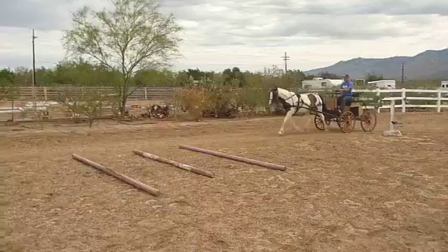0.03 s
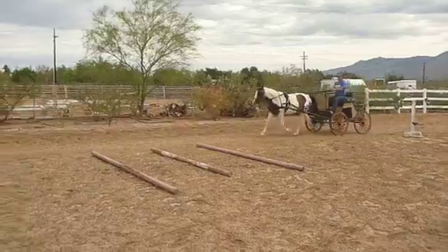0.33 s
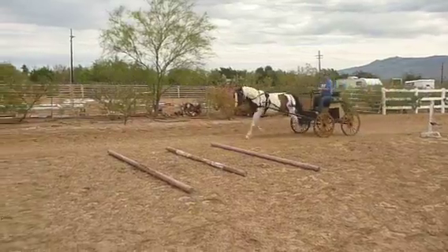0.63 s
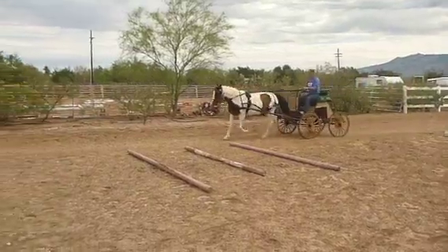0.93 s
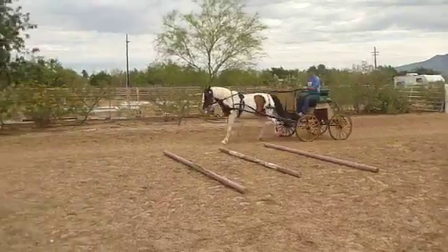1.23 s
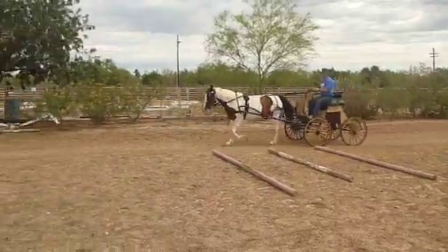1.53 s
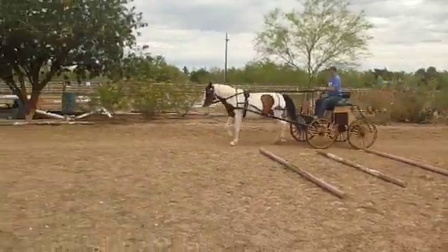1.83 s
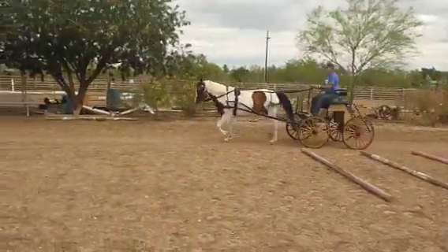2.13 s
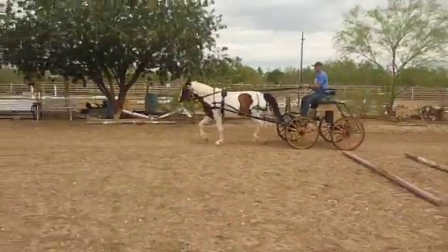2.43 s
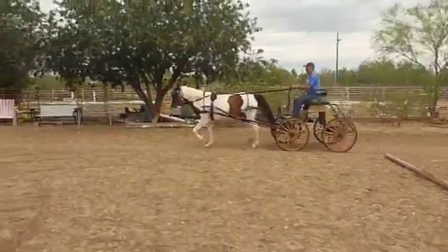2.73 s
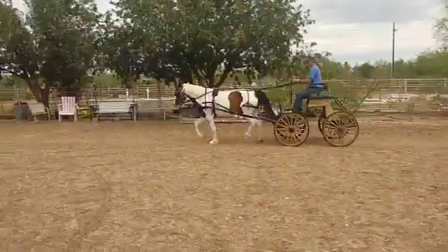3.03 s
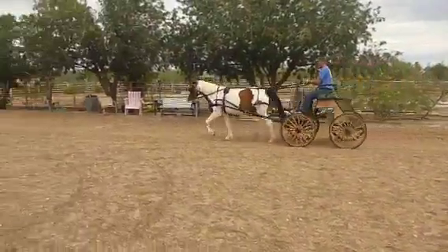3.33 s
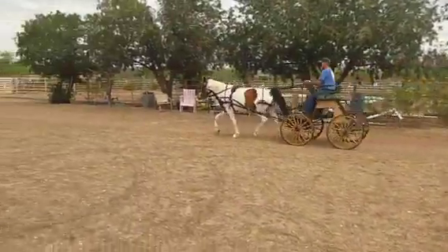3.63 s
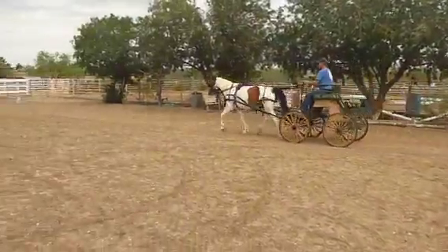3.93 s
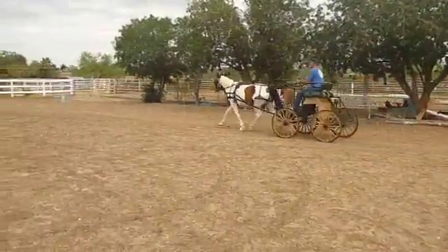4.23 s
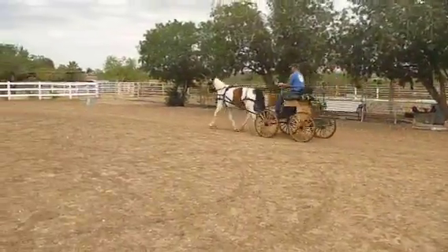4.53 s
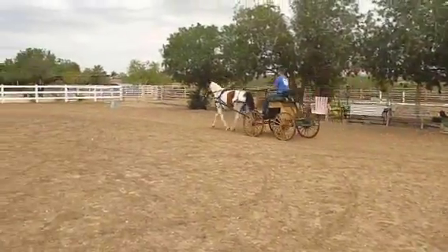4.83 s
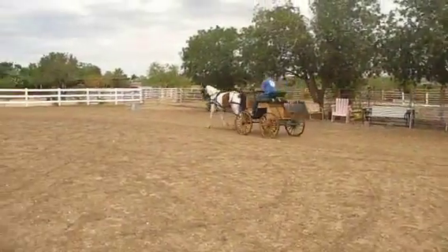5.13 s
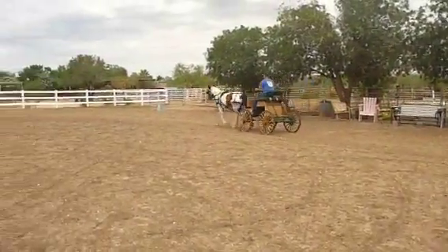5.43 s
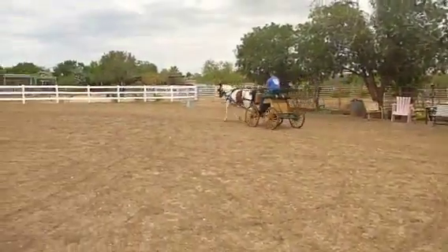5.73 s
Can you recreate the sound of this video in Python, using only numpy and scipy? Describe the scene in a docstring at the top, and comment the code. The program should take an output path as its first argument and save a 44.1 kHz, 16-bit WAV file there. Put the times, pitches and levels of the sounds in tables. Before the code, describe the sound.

A horse-drawn carriage rolls over sandy dirt outdoors, heard from start to finish above a faint hiss. The wheels make a continuous gritty crunch, while irregular jolts, many each second, rattle loose iron fittings, clack wooden shafts and give the hollow body low thumps. Bright little clinks stand out here and there. A wheel rings with a soft hollow note at about 1.2 and 2.1 seconds. The clatter is a little fuller from about 2.7 to 4.9 seconds, then eases slightly. Harness straps scuff and buckles click faintly, with brief thin metal squeaks around 0.8, 1.5, 2.4, 4.4 and 5.4 seconds. Light wind puffs on the microphone with a low rumble near 0.8, 1.7, 2.1 and 3.2 seconds. At about 5.8 and 5.9 seconds, two sharp, dry knocks sound close to the microphone, louder than everything else.

```python
"""Horse carriage on soft dirt

A horse walks a four-wheeled carriage past. The wheels crunch along, and each jolt rattles loose iron
fittings, wooden shafts and the hollow body. Harness straps scuff and their metal parts squeak thinly.
Light wind puffs at the microphone, and two sharp knocks sound close by at the end."""
import sys
import numpy as np
from scipy import signal
from scipy.fft import rfft, irfft, next_fast_len
from scipy.io import wavfile
from scipy.ndimage import uniform_filter1d, map_coordinates

SR = 44100
rng = np.random.default_rng(int(sys.argv[2]) if len(sys.argv) > 2 else 0)


def inscribe(sig):
    """Save sig as 16-bit PCM at rate SR to the path in sys.argv[1].

    A 1-D sig is mono; a 2-D sig holds one channel per row.
    Samples are clipped to [-1, 1] before scaling.
    """
    pcm = np.round(np.clip(np.atleast_2d(sig).T, -1, 1) * 32767)
    wavfile.write(sys.argv[1], SR, pcm.astype(np.int16))


N = 264159
T = np.arange(N) / SR


def amp(db):
    """Turn decibels (dB) into a number to multiply a sound by."""
    return 10 ** (np.asarray(db) / 20)


def unit(x):
    """Scale a sound to an average power of 1."""
    return x / np.sqrt(np.mean(x ** 2) + 1e-20)


def burst(x, seconds=0.022):
    """Give a short sound as much energy as a power of 1 held for this long."""
    return x / np.linalg.norm(x) * np.sqrt(seconds * SR)


def curve(rows):
    """Join (time, value) points with straight lines, one value per sample."""
    return np.interp(T, *np.transpose(rows))


def wobble(rate):
    """A smooth random curve through rate points a second."""
    return map_coordinates(rng.standard_normal(int(N * rate / SR) + 4), [T * rate])


def tone(t, hz, db, t60):
    """A ringing note. Its ring time, t60, is the seconds it takes to fade by 60 dB."""
    return amp(db - 60 * t / t60) * np.sin(2 * np.pi * hz * t)


def excite(force, ring):
    """Let every push in the force start its own copy of the ring."""
    return signal.fftconvolve(force, ring)[:len(force)]


def coloured(x, points, size=4096):
    """Filter a sound so that its lows and highs follow the (Hz, dB) points."""
    hz, db = np.transpose(points)
    log_hz = np.log(np.fft.rfftfreq(size, 1 / SR) + 1)
    cepstrum = irfft(np.log(amp(np.interp(log_hz, np.log(hz), db))))
    # make the filter ring only after a hit, never before
    cepstrum[1:size // 2] *= 2
    cepstrum[size // 2 + 1:] = 0
    response = irfft(np.exp(rfft(cepstrum)))
    return excite(x, response / np.linalg.norm(response))


def around(x, hz, edge_db):
    """Keep a broad band around hz, falling to edge_db an octave to either side."""
    return coloured(x, [(hz * 2.0 ** octave, abs(octave) * edge_db) for octave in range(-2, 3)])


def grains(count, rate, spread_db):
    """Tiny random hits of uneven size, about rate of them a second."""
    hits = rng.random(count) < rate / SR
    sizes = amp(spread_db * rng.standard_normal(count))
    return unit(hits * sizes * rng.choice([-1, 1], count))


def chatter(rate, attack, t60, tail_db, tail_t60):
    """The force of a loose part hitting its seat: a quick run of hits, then weaker bounces."""
    t = T[:SR // 5]
    rise = 1 - np.exp(-t / attack)
    fall = amp(-60 * t / t60) + amp(tail_db - 60 * t / tail_t60)
    return grains(len(t), rate, spread_db=2.0) * rise * fall


def add(track, start, sound):
    """Mix a sound into the track, start seconds in."""
    room = track[max(round(start * SR), 0):][:len(sound)]
    room += sound[:len(room)]


# The tone of the hiss. Each row: frequency in Hz, relative level in dB.
HISS_COLOUR = [(30, -16.5), (150, 21.5), (1000, 9.5), (3000, 12.5), (6200, 2), (6650, 14.5), (7100, 13.5),
               (7400, -10.5)]

def hiss():
    """A faint, steady noise behind everything."""
    return amp(-51.5) * coloured(rng.standard_normal(N), HISS_COLOUR)


# The light breeze. Each row: time in seconds, level in dB.
BREEZE_LEVELS = [(0.2, -51), (2.5, -46), (3.7, -57.5), (5.8, -51)]
# Gusts. Each row: time of the peak in seconds, level in dB, rise and fall time in seconds,
# pitch of the swirl of air in Hz.
WIND_GUSTS = [(0.783, -38, 0.037, 330), (0.804, -34.5, 0.011, 150), (0.959, -46, 0.015, 110),
              (1.688, -38.5, 0.06, 151), (2.093, -41, 0.089, 115), (3.198, -43, 0.08, 125)]

def wind(swirl_db=9.5):
    """A lumpy rumble swells with each gust, whose swirl pushes and then pulls on the microphone."""
    colour = [(15, -37), (35, -25), (65, -2.5), (120, 0.5), (170, 1), (260, -14.5), (600, -46.5),
              (2000, -87.5)]
    rumble = coloured(rng.standard_normal(N), colour)
    strength, swirls = amp(curve(BREEZE_LEVELS)), np.zeros(N)
    for peak, db, swell, hz in WIND_GUSTS:
        strength += amp(db) * np.exp(-np.abs(T - peak) / swell)
        phase = 2 * np.pi * hz * (T - peak)
        swirls -= amp(db + swirl_db) * phase * np.exp((1 - phase ** 2) / 2)
    lumps = amp(1.5 * wobble(25))
    return strength * lumps * rumble + swirls


# Close knocks. Each row: start in seconds, ring level in dB, crack level in dB,
# boost or cut of the lowest note in dB.
CLOSE_KNOCKS = [(5.7777, -21, -17.5, 1), (5.8969, -20, -10, -16)]
# The notes in a knock. Each row: pitch in Hz, relative level in dB, ring time in seconds.
KNOCK_NOTES = [(1070, -1.5, 0.037), (1770, 0.5, 0.024), (2290, -4, 0.0084), (2720, -15, 0.027),
               (3880, -4, 0.014)]

def knocks(contact_s=0.000098, crack_t60=0.0065, thud_db=-17):
    """Hard, dry knocks: a sharp crack, a few quickly fading notes and a short, low thud."""
    out, t = np.zeros(N), T[:SR // 10]
    for start, ring_db, crack_db, lowest_db in CLOSE_KNOCKS:
        notes = [tone(t, hz, db, t60) for hz, db, t60 in KNOCK_NOTES]
        ring = amp(lowest_db) * notes[0] + sum(notes[1:])
        from_peak = t / contact_s - 2
        click = (1 - 2 * from_peak ** 2) * np.exp(-from_peak ** 2)
        crack = click + 0.11 * amp(-60 * t / crack_t60) * rng.standard_normal(len(t))
        thud = tone(t, hz=330, db=thud_db, t60=0.0067)
        add(out, start, amp(ring_db) * ring + amp(crack_db) * crack - thud)
    return out


# Sliding harness straps. Each row: time of the peak in seconds, level in dB.
STRAP_SCUFFS = [(0.883, -47), (1.692, -46), (2.292, -42), (3.155, -43.5), (3.298, -45), (3.382, -46),
                (3.59, -47), (4.244, -44), (5.65, -51)]

def scuffs(swell_s=0.0059, scuff_hz=4500):
    """A strap slides through its ring with a soft, grainy swish."""
    strokes = sum(amp(db) * np.exp(-((T - peak) / swell_s) ** 2 / 2) for peak, db in STRAP_SCUFFS)
    return strokes * around(grains(N, rate=1700, spread_db=1.5), scuff_hz, edge_db=-16)


# Thin squeaks. Each row: start in seconds, pitch in Hz, level in dB, length of the rub in seconds.
HARNESS_SQUEAKS = [(0.708, 2770, -45.5, 0.042), (0.876, 2810, -41, 0.026), (1.46, 4350, -44.5, 0.045),
                   (2.362, 1560, -38, 0.048), (2.37, 3140, -47, 0.035), (2.583, 5220, -40.5, 0.012),
                   (4.364, 5180, -38.5, 0.011), (5.353, 3990, -33.5, 0.025)]

def squeaks(flutter_db=3, tail_db=-10, tail_t60=0.15, scratch_s=0.00048):
    """Metal rubs on metal and sings for a moment, unsteady in pitch and strength, then rings out."""
    out, t = np.zeros(N), T[:SR // 8]
    drift, grip = wobble(590), amp(flutter_db * wobble(280))
    for start, hz, db, length in HARNESS_SQUEAKS:
        depth = scratch_s / length  # the briefer, the scratchier
        waver = depth * np.roll(drift, -int(start * SR))[:len(t)]
        phase = 2 * np.pi * np.cumsum(hz * (1 + waver)) / SR
        stroke = np.minimum(t / length, 1)
        tail = stroke * amp(tail_db - 60 * np.maximum(t - length, 0) / tail_t60)
        swell = np.maximum(np.sin(np.pi * stroke), tail)
        add(out, start, amp(db) * swell * np.sin(phase))
    return out * grip


# Harness buckles snapping. Each row: start in seconds, relative level in dB.
BUCKLE_SNAPS = [(0.599, -27), (1.544, -29), (2.265, -27.5), (3.8213, -28), (4.176, -26), (5.666, -21.5),
                (5.808, -27.5), (5.867, -27.5), (5.946, -27.5)]

def buckles(t60=0.011, snap_hz=3200):
    """A buckle snaps tight with one short, bright click."""
    out, t = np.zeros(N), T[:SR // 20]
    for start, db in BUCKLE_SNAPS:
        force = amp(-60 * t / t60) * rng.standard_normal(len(t))
        add(out, start, amp(db - 19) * burst(around(force, snap_hz, edge_db=-11)))
    return out


# The tone of a dull wooden clack. Each row: frequency in Hz, relative level in dB.
WOOD_COLOUR = [(350, -13.5), (600, -2), (1150, 2.5), (1700, -5), (2300, -8.5), (5000, -36.5)]
# The notes of the frame, shafts and wheels. Each row: pitch in Hz, relative level in dB,
# ring time in seconds.
FRAME_NOTES = [(504, -5.5, 0.047), (612, 0.5, 0.039), (735.6, 3, 0.041), (1007, 0.5, 0.046),
               (1177, -1.5, 0.042), (1330, -1, 0.031), (1638, -1, 0.022), (2230, -15.5, 0.025)]

def frame(force, ring_db, vary_db):
    """Struck woodwork clacks and rings. Each note's strength is random, as if hit in a new spot."""
    t = T[:SR // 10]
    ring = sum((-1) ** k * tone(t, hz, db + vary_db * rng.standard_normal(), t60)
               for k, (hz, db, t60) in enumerate(FRAME_NOTES))
    pushes = force * rng.choice([-1, 1], len(force))  # hits bend the frame either way
    ringing = excite(pushes, ring / np.linalg.norm(ring))
    return (coloured(force, WOOD_COLOUR) + amp(ring_db) * ringing) / np.hypot(1, amp(ring_db))


# The tone of the carriage body. Each row: frequency in Hz, relative level in dB.
BODY_COLOUR = [(80, -23.5), (120, -9.5), (180, -1.5), (215, 1.5), (250, 4.5), (320, -5), (375, -2.5),
               (450, -14.5), (900, -40)]

def hollow_body(force):
    """The hollow body answers a force with a low boom."""
    return coloured(force, BODY_COLOUR)


# Rolling over rougher and smoother ground. Each row: time in seconds, level in dB.
ROLLING_LEVELS = [(0.34, -46), (0.62, -50), (0.95, -47.5), (1.15, -46), (1.38, -51), (1.7, -46),
                  (2.2, -48.5), (2.45, -43), (2.68, -48.5), (2.82, -41), (3.05, -45), (3.4, -44),
                  (3.78, -45.5), (4.6, -42.5), (4.74, -45.5), (5.2, -48.5), (5.55, -46.5), (5.9, -48.5)]

def shake():
    """How much harder than average the ground shakes the carriage, in dB."""
    rolling_db = curve(ROLLING_LEVELS)
    return rolling_db - rolling_db.mean()


def crackle(rate, low_hz=1300, high_hz=6500, cycles=3.5, sizes=16):
    """Crumbs break, rate a second of each size. Each size gives a tiny ping of its own pitch."""
    out, t = np.zeros(N), T[:SR // 50]
    for hz in np.geomspace(low_hz, high_hz, sizes):
        age = hz * t / cycles
        ping = age * np.exp(-age) * np.sin(2 * np.pi * hz * t)
        out += hz * excite(grains(N, rate, spread_db=2), ping)
    return unit(out)


# Sand crunching under the tyres. Each row: time in seconds, base level in dB.
SAND_LEVELS = [(0.3, -53), (4.5, -52.5), (5.15, -55), (5.8, -53.5)]
# The tone of the sand. Each row: frequency in Hz, relative level in dB.
SAND_COLOUR = [(1200, -7.5), (2400, 1), (2800, 1), (3300, -4), (4050, 1), (4900, -4), (6000, -2.5),
               (7400, -17)]

def wheels(sand_follows=0.32, drum_db=-45, drum_follows=0.45):
    """Tyres crush dirt and sand, while the uneven ground rings the frame and drums the body."""
    shake_db, bumps = shake(), wobble(30)
    wood_level = amp(curve(ROLLING_LEVELS) + 0.17 + 2.33 * bumps)
    wood = frame(grains(N, rate=2600, spread_db=5), ring_db=4, vary_db=2.5)
    sand_level = amp(curve(SAND_LEVELS) + sand_follows * shake_db + bumps + 1.2 * wobble(45))
    sand = unit(coloured(crackle(rate=420), SAND_COLOUR))
    drum_level = amp(drum_db + drum_follows * shake_db + wobble(10))
    drum = hollow_body(grains(N, rate=900, spread_db=3.5))
    return wood_level * wood + sand_level * sand + drum_level * drum


# The hollow ring of a rolling wheel. Each row: time in seconds, level in dB.
WHEEL_LEVELS = [(0.3, -58.5), (1.1, -60.5), (1.22, -42.5), (1.42, -62), (1.62, -48), (1.95, -48.5),
                (2.1, -40), (2.3, -55), (3.2, -64.5)]
# The wheel's notes. Each row: pitch in Hz, relative level in dB, ring time in seconds.
WHEEL_NOTES = [(715.7, 0, .2), (1020, -11.5, 0.08), (1182, -7, 0.069), (1324, -6.5, 0.063)]

def wheel_ring():
    """The ground keeps tapping a wheel, which sings on with an even, hollow note."""
    ring = sum(tone(T[:SR // 4], hz, db, t60) for hz, db, t60 in WHEEL_NOTES)
    ringing = excite(grains(N, rate=440, spread_db=2.5), ring)
    power = np.abs(uniform_filter1d(ringing ** 2, SR // 20))
    even = ringing / np.sqrt(power + 1e-9)
    return amp(curve(WHEEL_LEVELS)) * even


def jiggle(count=700, low_hz=1000, high_hz=4600, cycles=7.4, base_db=-39, spread_db=4, tilt_db=-6):
    """Spokes, links and straps jiggle all the time: many faint clacks, each with its own pitch."""
    out, t = np.zeros(N), T[:SR // 20]
    shake_db = shake()
    for when, pitch, size in rng.random((count, 3)):
        turns = low_hz * (high_hz / low_hz) ** pitch * t
        db = base_db + spread_db * (2 * size - 1) + tilt_db * pitch + shake_db[int(when * N)]
        swell = (1 - np.exp(-turns / 2)) * np.exp(-turns / cycles)
        add(out, when * N / SR, amp(db) * swell * np.sin(2 * np.pi * turns))
    return out


# Wood hitting wood. Each row: start in seconds, relative level in dB, pitch in Hz.
WOOD_CLACKS = [(0.341, -26, 1090), (1.333, -27.5, 1240), (1.724, -31, 3020), (1.819, -27, 1440),
               (1.864, -30, 1390), (1.9189, -25, 1460), (2.16, -32, 2030), (2.237, -29.5, 1170),
               (2.318, -25, 1180), (2.601, -26.5, 1200), (2.834, -30, 1100), (3.037, -25, 1390),
               (3.235, -22.5, 1170), (3.335, -27.5, 930), (3.505, -29, 1640), (3.681, -22.5, 1420),
               (3.873, -23, 1935), (4.086, -25.5, 734), (4.2197, -24, 1140), (4.334, -29.5, 870),
               (4.404, -22.5, 673), (4.53, -33.5, 1120), (4.616, -29, 2190), (4.779, -23, 1190),
               (4.857, -30, 1240), (4.973, -27.5, 2010), (5.0465, -26, 990), (5.555, -26.5, 690),
               (5.636, -29.5, 2090)]

def clacks(t60=0.029, wood_db=-4, body_db=-6):
    """A loose shaft or wheel knocks: one hollow pitch stands out over the frame and body."""
    out, t = np.zeros(N), T[:SR // 20]
    for start, db, hz in WOOD_CLACKS:
        force = chatter(rate=1800, attack=0.00022, t60=0.041, tail_db=-28.5, tail_t60=0.16)
        ring = burst(excite(force, amp(-60 * t / t60) * np.cos(2 * np.pi * hz * t)))
        wood = amp(wood_db) * burst(frame(force, ring_db=-4, vary_db=7.5))
        boom = amp(body_db) * burst(hollow_body(force))
        add(out, start, amp(db - 15) * (ring + wood + boom))
    return out


# Blows on iron fittings. Each row: start in seconds, relative level in dB, pitch in Hz.
IRON_CLINKS = [(0.118, -34.5, 4020), (0.7028, -33, 3920), (1.4633, -32, 4380), (1.8172, -34.5, 4170),
               (2.1214, -38, 4100), (2.396, -34, 4470), (2.7522, -25.5, 3920), (2.9073, -33.5, 4280),
               (3.417, -29, 4320), (4.067, -27, 4170), (4.2143, -33, 4270), (4.8552, -37, 4130)]

def clinks(t60=0.017):
    """A fitting struck squarely rings briefly at one bright pitch."""
    out, t = np.zeros(N), T[:SR // 20]
    for start, db, hz in IRON_CLINKS:
        force = chatter(rate=3000, attack=0.00047, t60=0.01, tail_db=-29, tail_t60=0.12)
        add(out, start, amp(db - 11) * burst(excite(force, tone(t, hz, 0, t60))))
    return out


# The tone of clashing iron. Each row: frequency in Hz, relative level in dB.
IRON_COLOUR = [(1200, -26), (2000, -3), (2600, 2), (3300, -5.5), (3700, -0.5), (4100, 2.5), (4700, -4),
               (5700, 1), (7000, -13)]

def fitting(force, main_hz=4120, main_db=3, t60=0.03, ring_db=-3, count=6):
    """An iron fitting clinks near a pitch they all share, and rings at a few pitches of its own."""
    t = T[:SR // 20]
    own = sum(tone(t, hz, 0, t60) for hz in rng.uniform(1800, 5600, count))
    main = tone(t, main_hz * (1 + 0.076 * rng.standard_normal()), main_db, t60)
    ringing = excite(force, own + main)
    return unit(coloured(force, IRON_COLOUR)) + amp(ring_db) * unit(coloured(ringing, IRON_COLOUR))


# Jolts that throw the loose parts about. Each row: start in seconds, relative level of the iron in dB,
# relative level of the wood and body in dB.
CARRIAGE_JOLTS = [(0.1174, -35, -45), (0.1561, -34.5, -39), (0.1972, -30.5, -44), (0.3378, -27, -36),
                  (0.3802, -25.5, -36), (0.4647, -26.5, -36.5), (0.496, -28.5, -40.5), (0.6502, -22.5, -30),
                  (0.6599, -26, -37.5), (0.7013, -35, -35.5), (1.094, -28.5, -32.5), (1.1486, -31.5, -61),
                  (1.1837, -27.5, -42), (1.232, -24, -33.5), (1.289, -32.5, -40.5), (1.4254, -29.5, -37),
                  (1.4638, -25, -34.5), (1.5803, -33, -31.5), (1.6194, -27.5, -34.5), (1.732, -33, -32),
                  (1.8177, -25.5, -33.5), (1.8618, -28, -34.5), (1.9935, -30, -45), (2.0413, -24.5, -30.5),
                  (2.0819, -23.5, -32.5), (2.1219, -26.5, -34.5), (2.1518, -32.5, -39),
                  (2.3091, -24.5, -35.5), (2.3969, -32.5, -37.5), (2.4481, -37, -33.5),
                  (2.5099, -35, -38.5), (2.5366, -27.5, -35.5), (2.7544, -25, -31.5),
                  (2.7643, -27.5, -29.5), (2.794, -30.5, -30.5), (2.8043, -29.5, -40), (2.8533, -32.5, -42),
                  (2.9068, -25.5, -33), (2.9711, -24.5, -38), (3.3539, -24, -31), (3.4169, -29, -32.5),
                  (3.4642, -38, -34.5), (3.6309, -31.5, -41), (3.7265, -30, -33), (3.871, -24, -27.5),
                  (4.0678, -23, -31), (4.215, -32.5, -33.5), (4.259, -29.5, -33), (4.3936, -27, -35),
                  (4.4209, -33, -39.5), (4.4526, -28.5, -42), (4.4944, -30, -35.5), (4.6162, -23, -33.5),
                  (4.6687, -28.5, -33), (4.774, -28, -30), (4.8237, -26.5, -37), (4.8571, -27, -33.5),
                  (4.9004, -34, -39), (4.9722, -33, -40), (5.2845, -30.5, -35.5), (5.402, -34, -36),
                  (5.4992, -32, -34), (5.5648, -32, -40), (5.6362, -35, -36.5), (5.6993, -30.5, -37)]

def rattle():
    """Ruts and clods jolt the carriage: iron clashes first, wood follows, the hollow body booms on."""
    out = np.zeros(N)
    for start, iron_db, wood_db in CARRIAGE_JOLTS:
        iron = fitting(chatter(rate=2200, attack=0.0012, t60=0.034, tail_db=-25, tail_t60=0.17))
        blow = chatter(rate=1700, attack=0.0034, t60=0.055, tail_db=-13.5, tail_t60=0.22)
        wood = frame(blow, ring_db=3.5, vary_db=5.5)
        wood = np.diff(wood, prepend=0) + 0.12 * wood  # a hard blow is brighter than rolling
        boom = hollow_body(chatter(rate=1600, attack=0.0063, t60=0.14, tail_db=-17.5, tail_t60=0.1))
        add(out, start, amp(iron_db - 15) * burst(iron))
        add(out, start, amp(wood_db - 3.5) * burst(wood))
        add(out, start, amp(wood_db - 7.5) * burst(boom))
    return out


def scene():
    """Mix the carriage, harness, knocks and wind over the hiss, in one channel."""
    mix = hiss()
    mix += rattle() + clinks() + clacks() + jiggle()
    mix += buckles() + scuffs()
    mix += wheels() + wheel_ring()
    mix += squeaks() + knocks() + wind()
    return mix[None]


def record(dry, start_s=0.086, top_hz=7340, offset=-0.042):
    """Cut the highest treble, shift the wave a little below zero and open with a moment of silence."""
    size = next_fast_len(N + SR // 2)
    low_pass = 1 / np.sqrt(1 + (np.fft.rfftfreq(size, 1 / SR) / top_hz) ** 120)
    dulled = irfft(rfft(dry, size) * low_pass, size)[:, :N]
    fade_in = np.clip((T - start_s) / 0.004, 0, 1)
    return (dulled + offset) * fade_in


dry = scene()
out = record(dry)
inscribe(out)
```